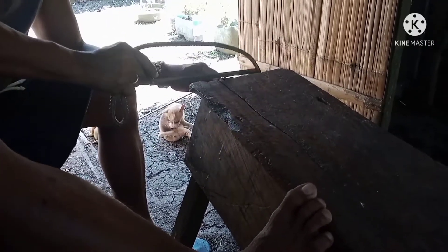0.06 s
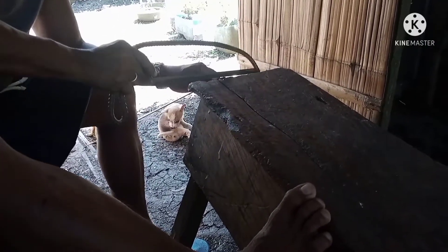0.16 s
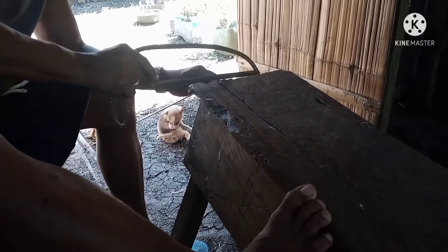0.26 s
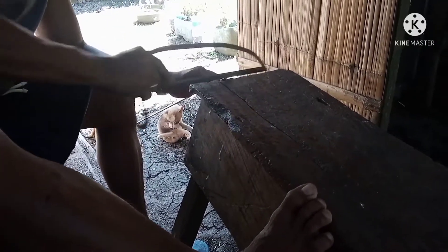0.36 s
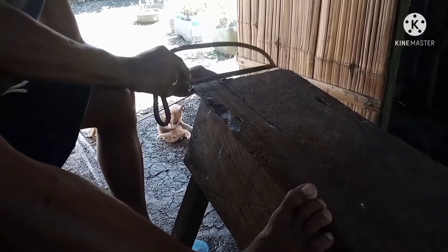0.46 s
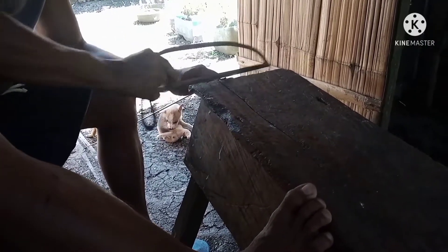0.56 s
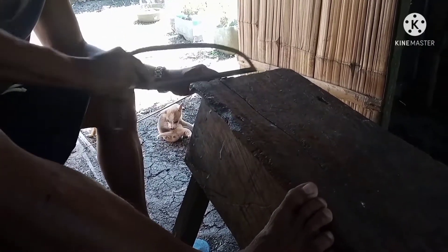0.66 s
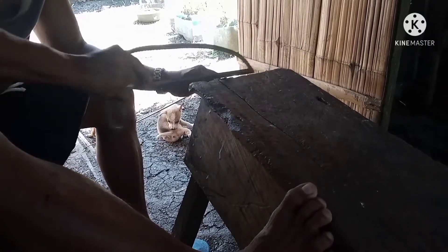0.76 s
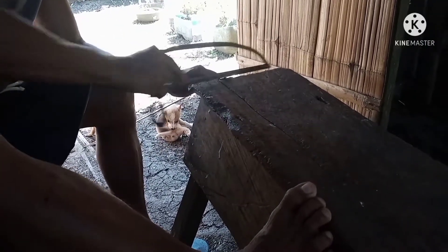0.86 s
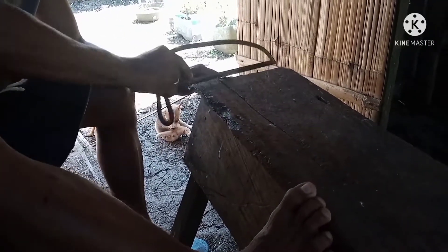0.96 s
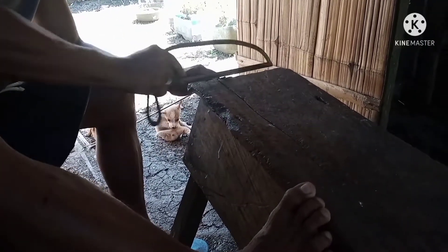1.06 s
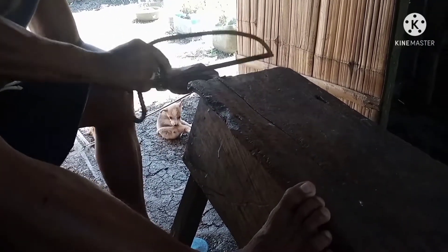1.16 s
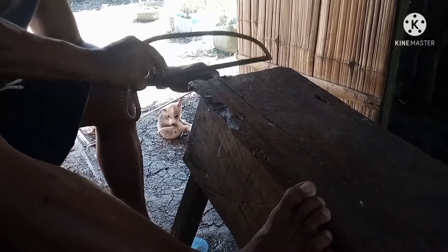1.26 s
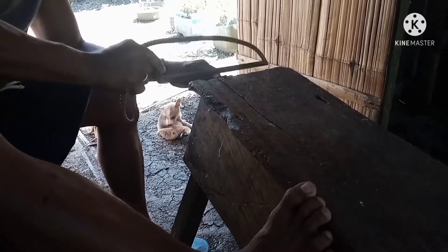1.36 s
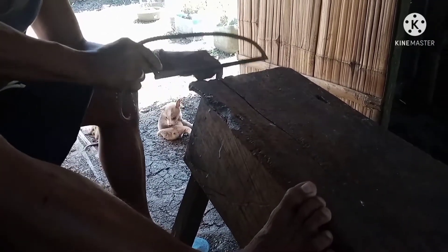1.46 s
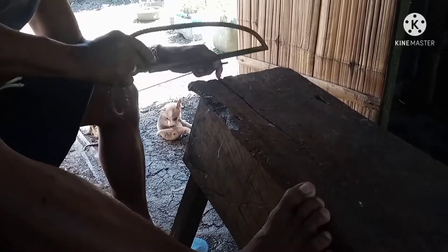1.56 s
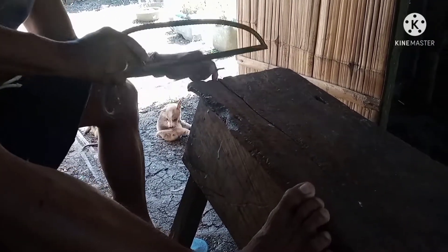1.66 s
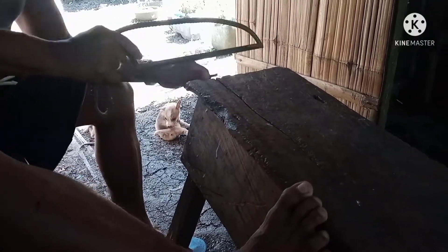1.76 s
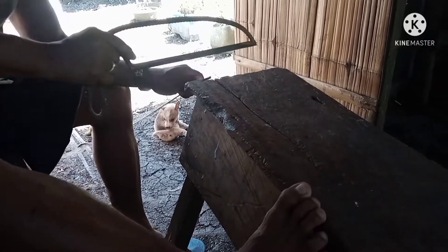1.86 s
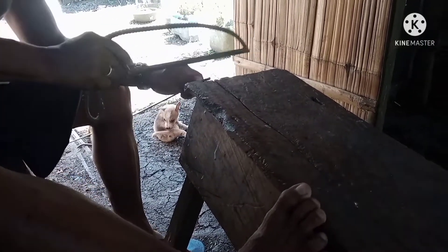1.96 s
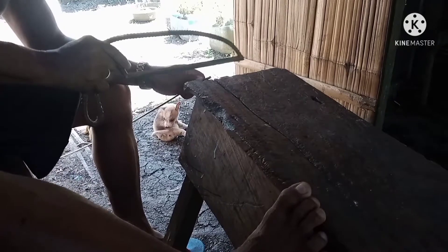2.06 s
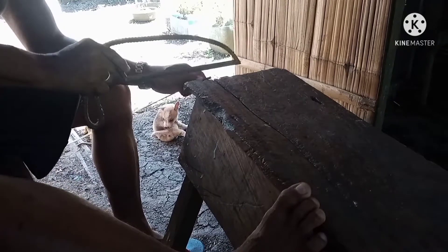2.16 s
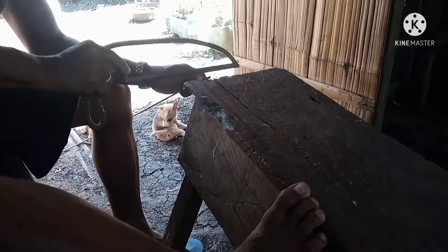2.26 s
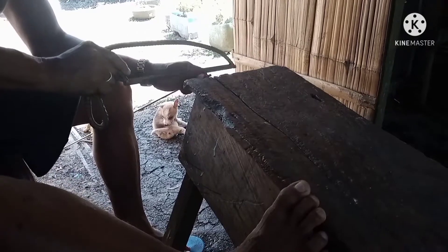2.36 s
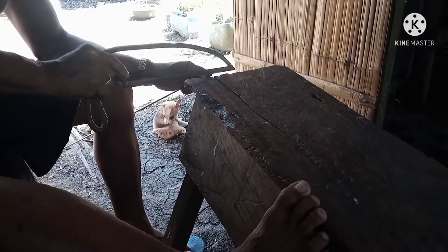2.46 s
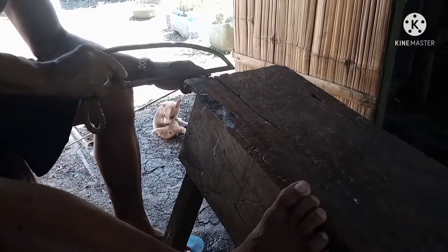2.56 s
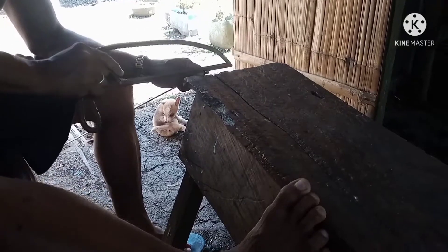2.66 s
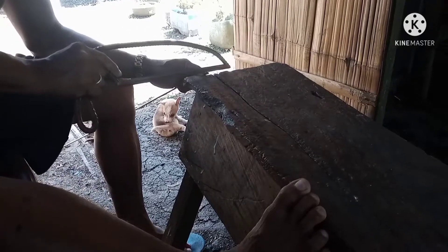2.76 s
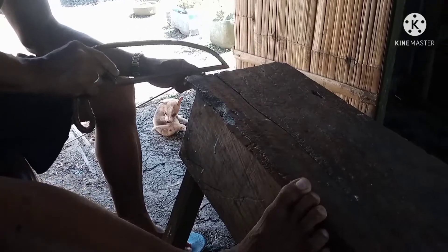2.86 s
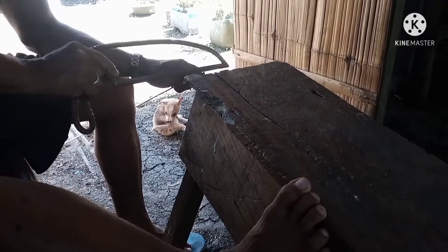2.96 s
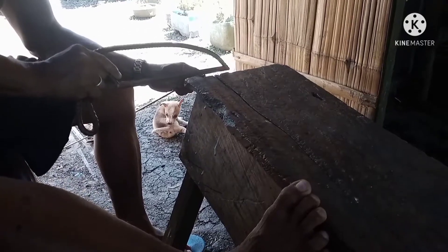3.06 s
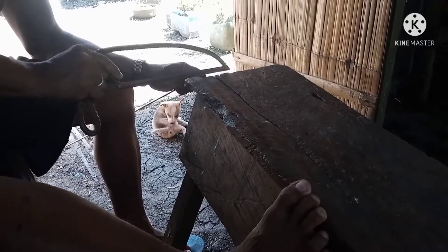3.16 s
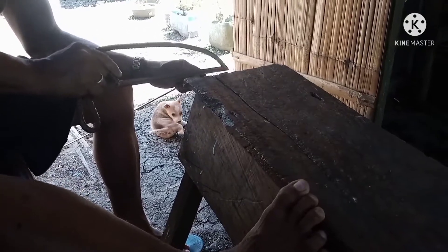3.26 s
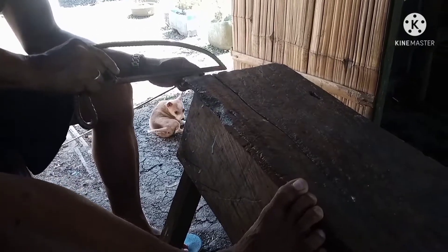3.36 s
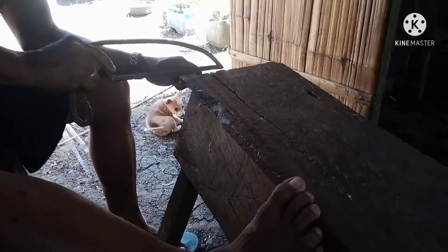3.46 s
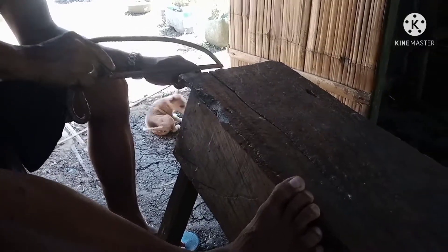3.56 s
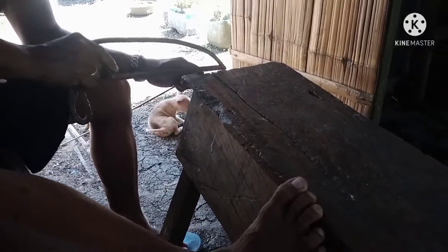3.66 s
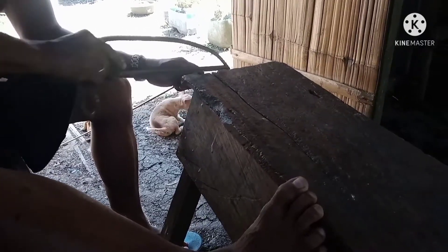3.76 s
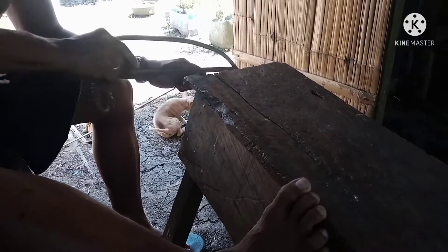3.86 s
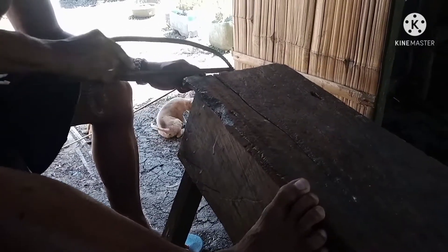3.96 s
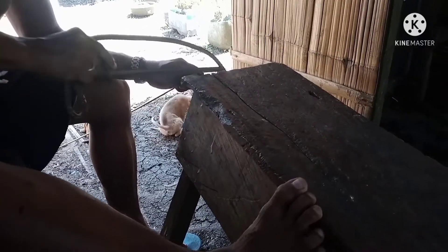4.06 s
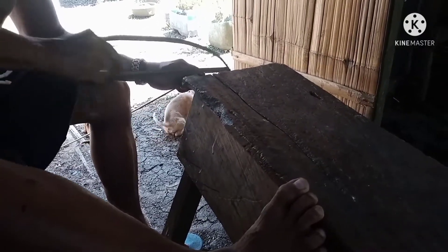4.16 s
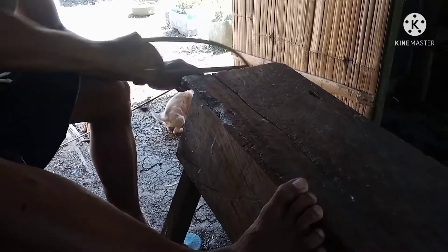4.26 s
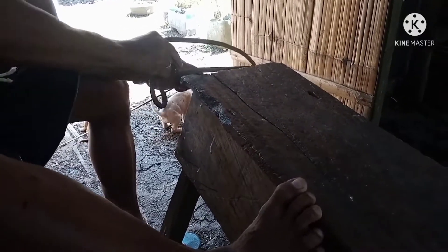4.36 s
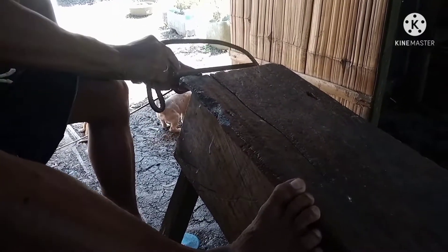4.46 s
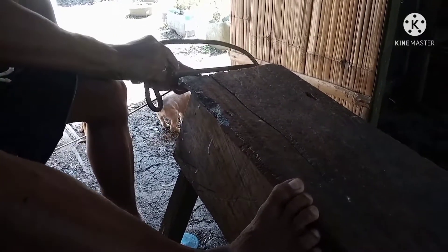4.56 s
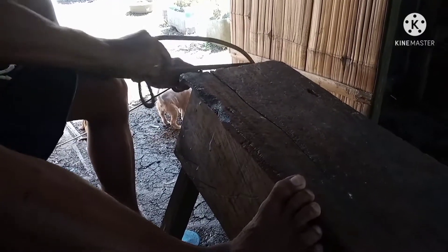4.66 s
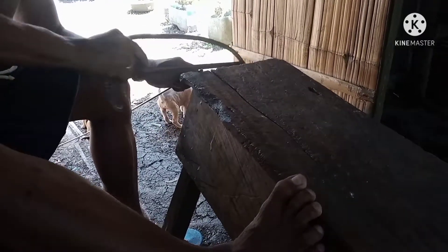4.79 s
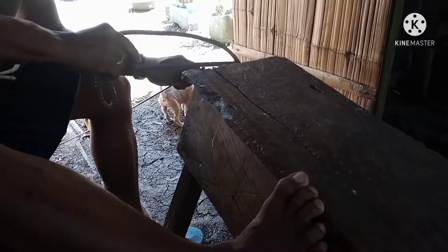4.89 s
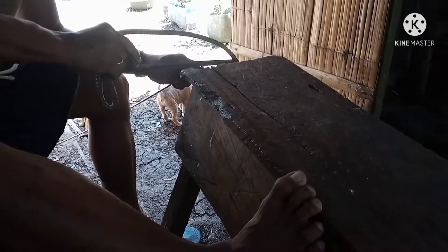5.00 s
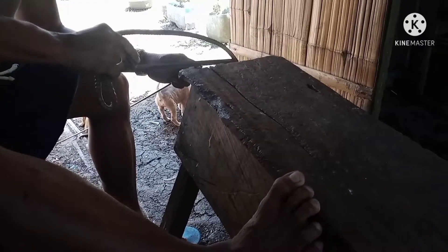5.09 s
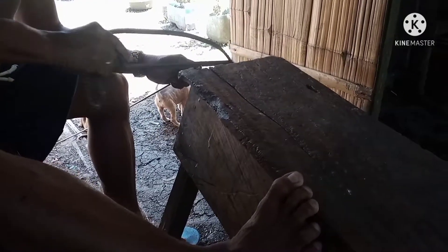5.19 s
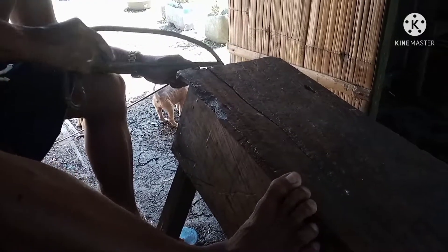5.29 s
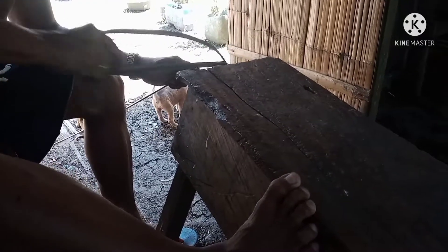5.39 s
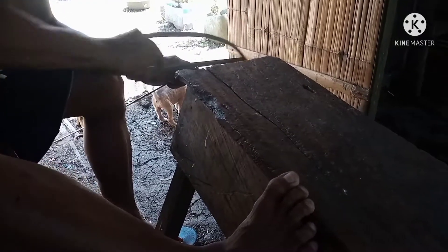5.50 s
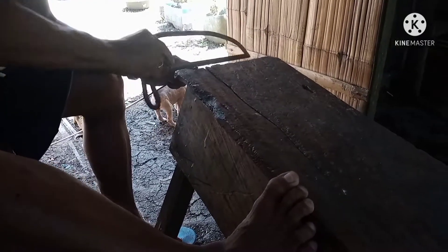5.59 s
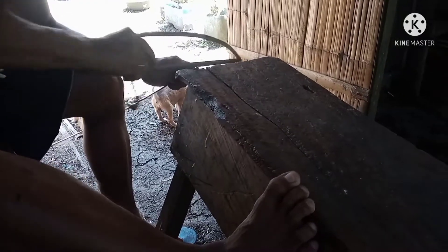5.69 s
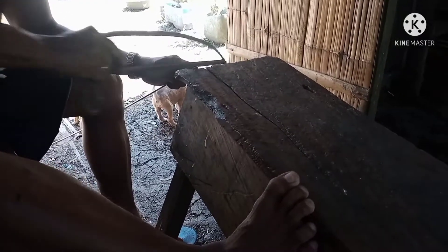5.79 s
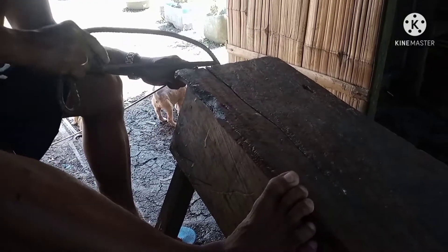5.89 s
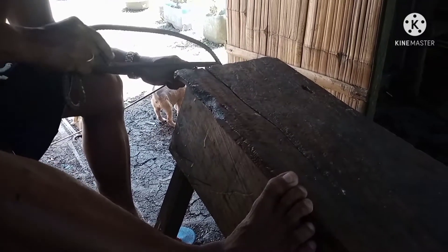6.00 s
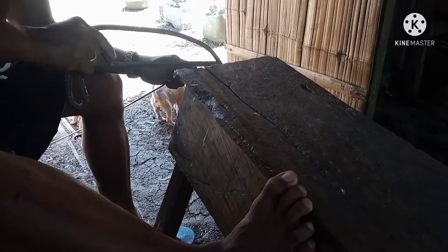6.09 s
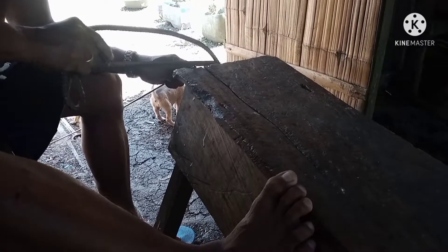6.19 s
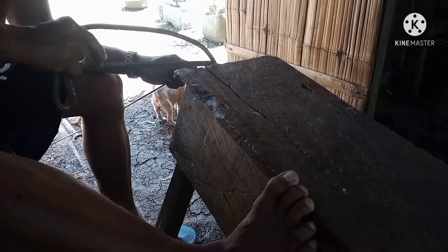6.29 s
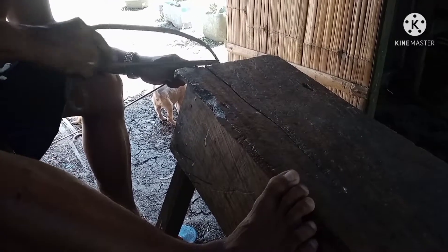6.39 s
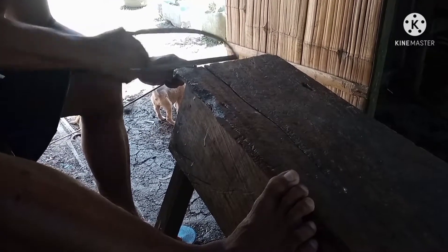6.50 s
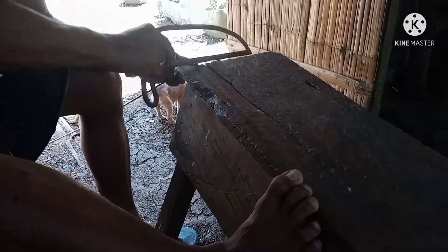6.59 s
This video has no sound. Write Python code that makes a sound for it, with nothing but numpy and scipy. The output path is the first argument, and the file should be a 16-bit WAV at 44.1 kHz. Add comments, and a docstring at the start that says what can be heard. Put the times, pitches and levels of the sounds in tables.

```python
"""A bow hacksaw cuts a steel rod on a heavy wooden bench in an open shed, heard close by in mono.
Three bright strokes and a fainter one skate over the rod; after a few knocks the saw runs deeper
in its groove, snagging now and then. Random tooth strikes ring steel and wood resonances together.
Short noise bursts make the clicks and thuds, gliding sines the blade's squeaks and a chick's peeps.
Filtered noise is the yard behind; the microphone loses the deep bass and the extreme treble."""
import sys
import numpy as np
from scipy import signal
from scipy.fft import rfft, irfft, next_fast_len
from scipy.io import wavfile
from scipy.ndimage import uniform_filter1d, map_coordinates

SR = 44100
rng = np.random.default_rng(int(sys.argv[2]) if len(sys.argv) > 2 else 0)


def store_pcm(level_fs):
    """Save levels as 16-bit WAV."""
    pcm = np.round(np.clip(level_fs, -1, 1) * 32767).astype(np.int16)
    wavfile.write(sys.argv[1], SR, np.atleast_2d(pcm).T)


N = 292824

# passes of the blade, before the trims in saw(): start_s, length_s, fastest_share (of the pass),
# rasp_db, hiss_over_rasp_db, bench_over_rasp_db
STROKES = [ (0.39, 0.262, .68, -22, 0.32, -12.2), (0.612, 0.31, 0.56, -22.5, -0.88, -6),
           (0.878, .26, 0.5, -22, -0.8, -8.3), (1.122, 0.1, 0.598, -29, -4.5, -8),
           (2.834, 0.18, 0.233, -62.5, 9, 4), (2.952, 0.18, .27, -43, 6.5, -1.5),
           (3.078, 0.28, .25, -61.5, -4, 3), (3.286, 0.1775, 0.2, -58, 5.5, 5.5),
           (3.446, 0.14, 0.32, -57.5, -6.5, 8.5), (3.585, 0.098, 0.28, -53.5, -4, 7),
           (3.803, .26, 0.52, -31, -4, 1.3), (4.022, 0.26, 0.61, -32.5, -0.3, 1.44),
           (4.214, 0.33, 0.52, -23.5, -2, -0.4), (4.726, 0.43, 0.4, -26.5, -0.65, 3.3),
           (5.239, .276, 0.61, -30.5, -0.82, -3), (5.466, .29, 0.56, -22.5, -4, -1.8),
           (5.725, 0.41, 0.47, -25, -1.5, 1.5), (6.076, .2, 0.24, -39, -5, 0),
           (6.272, 0.22, .53, -35, -3.5, 3), (6.474, 0.36, .32, -24, -5.5, -0.5)]
# short brushes of the teeth on the rod: start_s, length_s, level_db
BRUSHES = [(0.0, 0.029, -52.5), (0.205, 0.0265, -34.5), (0.466, .014, -37.5), (2.57, 0.077, -58.5)]
# blade resonances while skating, then in the groove: pitch_hz, width_hz, relative_level_db
SKATE_MODES = [(951, 68, -3), (1252.7, 26, -14.5), (1485, 12, -9), (1650, 120, -8), (2050, 43, -2),
               (2535, 120, -1.5), (3150, 280, 0.5), (3526, 75, -10), (4160, 77, -9.5), (4390, 68, -9),
               (5110, 75, -12), (5930, 54, -9), (6229, 81, -1.5), (7010, 62, -17.5), (6800, 56, -26.5)]
GROOVE_MODES = [(774, 102, 0), (954, 28, 1.5), (1780, 240, -3), (2270, 26, -15), (2710, 103, -4),
                (3208.4, 138.7, 1.18), (3435, 90, -3), (4674, 77, -0.5), (5070, 34, -7.5),
                (5726, 51, -21.5), (6041, 80, 7.5), (7373, 85, -0.5), (7823, 190, -5)]
# broad colour of the blade under those resonances: frequency_hz, relative_level_db
SKATE_RASP = [(400, -23), (620, -17.5), (780, -12.5), (1400, -15.5), (2300, -12.5), (2900, -14), (3500, -4),
              (4300, -13.5), (5400, -4.5), (6400, -9.5), (7200, -17.5), (8300, -39), (11000, -44)]
GROOVE_RASP = [(400, -64), (650, -15), (1100, -4), (1350, -13), (1800, -9), (2600, -5.5), (2900, -15.5),
               (3400, -9.5), (4300, -11.5), (5400, -6), (6400, 0.5), (7100, -8.5), (8300, -20.5),
               (11000, -35)]
# the blade skates on the rod before this time and runs in its groove after it
SEATED_S = 2.5


def saw():
    """Skating teeth ring bright; in the groove the rasp is deeper and throws more chips."""
    out = np.zeros(N)
    skate = lambda: body(SKATE_RASP, flexed(SKATE_MODES, shift=0.0015, spread_db=5.8), modes_db=-2)
    groove = lambda: body(GROOVE_RASP, flexed(GROOVE_MODES, shift=0.0058, spread_db=1.6), modes_db=-2)
    for row in STROKES:
        start_s = row[0]
        if start_s < SEATED_S:
            x = stroke(row, skate(), rate=2600, scatter_db=3.0, chatter_db=1.5, ring_db=-4.5,
                       rasp_db=-0.6, edge_db=0.2, bench_db=-1.0, fizz_db=-20.5)
        else:
            x = stroke(row, groove(), rate=1800, scatter_db=3.0, chatter_db=1.7, ring_db=-3.5,
                       rasp_db=0.82, edge_db=0.36, bench_db=0.2, fizz_db=-13.5)
        add(out, start_s, x)
    for start_s, length_s, level_db in BRUSHES:
        force = teeth(np.ones(int(length_s * SR)), rate=3500, scatter_db=2, chatter_db=1.5, rub=.5)
        add(out, start_s, amp(level_db) * through(np.pad(force, (0, SR // 8)), skate()))
    return out


# bench resonances: pitch_hz, width_hz, relative_level_db
BENCH = [(125, 12, -7.5), (167.4, 49.9, -3), (306, 31.6, -3.5), (412.47, 27.5, 7), (452.6, 30.3, 8),
         (571, 45, -1)]
# broad colours of the bench wood and of flying chips: frequency_hz, relative_level_db
WOOD = [(30, -55.5), (70, -29.5), (140, -30), (240, -21.5), (500, -8), (650, -31.5), (1200, -69.5)]
FIZZ = [(5000, -25.5), (7600, 13), (9200, 2.5), (11000, -6.5), (13000, -21.5), (15200, -9.5), (16000, -11)]
# snags in mid-pass, at full strength in the tooth edges: release_s, stuck_s, jerk_db
SNAGS = [(0.5056, 0.0068, 0), (0.746, 0.016, 0.5), (4.226, 0.0025, 7.5), (4.928, .003, -2.5),
         (4.954, 0.022, 5.5), (4.98, .013, 7), (5.017, 0.01434, 13), (5.054, .01, 11.5),
         (5.116, 0.027, 14.5), (5.816, 0.013, 7.5), (5.865, 0.0213, 5.5), (5.892, 0.0166, 0),
         (6.087, .012, 9)]
# each layer grows as this power of the blade's speed
RASP_POWER, HISS_POWER, BENCH_POWER = 1.67, 2.16, 1.41
# the first pass is already under way when the teeth land on the rod
TOUCHDOWN_S = 0.485
# after each turn of the arm the teeth hold for a moment before they slide
HOLD_S = .044
# the bench rocks under the blade, so that its drumming comes in lumps
ROCK_DB, ROCK_PER_S = 2.07, 70
# at full speed the teeth outrun the bench's low modes, and its drumming sags by this much
OUTRUN_DB = 5.5
# below this the blade's rasp, above it the hiss of the tooth edges
EDGE_HZ = 4000


def stroke(row, steel, rate, scatter_db, chatter_db, ring_db, rasp_db, edge_db, bench_db, fizz_db):
    """One pass of the blade: the same tooth strikes ring the steel, drum the bench and throw chips."""
    start_s, length_s, fastest_share, rasp_peak, hiss_over, bench_over = row
    speed = swing(length_s, fastest_share)
    t = start_s + np.arange(len(speed)) / SR
    speed_db = 20 * np.log10(speed)
    rasp = rasp_peak + RASP_POWER * speed_db
    edge = rasp_peak + hiss_over + HISS_POWER * speed_db
    bench = rasp_peak + bench_over + BENCH_POWER * speed_db
    bench += ROCK_DB * wobble(ROCK_PER_S, len(t)) - OUTRUN_DB * speed ** 4
    force = teeth(np.maximum(speed, .35), rate=rate, scatter_db=scatter_db, chatter_db=chatter_db, rub=0.38)
    force = force * (t >= TOUCHDOWN_S)
    snag = snagging(t, [(start_s + HOLD_S, HOLD_S, 0), *SNAGS])

    def drive(db, response):
        pushed = np.pad(force * amp(db), (0, SR // 8))
        return through(pushed, response / np.linalg.norm(response))

    # the flexing blade carries the lower rasp, the tooth edges the hiss above it
    blade = drive(rasp + rasp_db + 0.72 * snag, band(steel, EDGE_HZ, "low", order=5))
    blade += drive(edge + edge_db + snag, band(steel, EDGE_HZ, "high", order=5))
    blade += drive(edge + fizz_db + snag, body(FIZZ))
    ring = bending(blade, len(t), t60=0.044, count=5)
    wood = drive(bench + bench_db + 0.54 * snag, body(WOOD, BENCH))
    return (blade + amp(ring_db) * ring) / np.hypot(1, amp(ring_db)) + wood


def swing(length_s, fastest_share):
    """Speed of the arm over one pass, 0-1: from rest to full speed and back to rest."""
    u = np.linspace(0, 1, int(length_s * SR))
    turn = np.interp(u, [0, np.clip(fastest_share, .05, .95), 1], [0, .5, 1])
    return np.abs(np.sin(np.pi * turn)) + 1e-4


def teeth(speed, rate, scatter_db, chatter_db, rub):
    """Force of steady strength: uneven tooth strikes, denser with speed, clumped by chatter, over rubbing."""
    n = len(speed)
    struck = rng.random(n) < rate * speed / SR
    strikes = struck * amp(scatter_db * np.clip(rng.standard_normal(n), -2, 2))
    force = unit(strikes - strikes.mean()) + rub * rng.standard_normal(n)
    force = force * amp(chatter_db * wobble(169.0, n))
    # the hand keeps the mean pressure even over a few hundredths of a second
    return force / np.sqrt(np.abs(uniform_filter1d(force ** 2, size=1100)) + 1e-9)


# a stuck blade falls quiet at this rate down to a floor; the jerk dies with this time constant
STALL_DB_PER_S, STALL_DEPTH_DB, JERK_S = 1693.5, 15.5, 0.0089


def snagging(t, snags):
    """Gain in dB: the scrape dies away while the blade sticks and flares as it breaks free."""
    db = np.zeros(len(t))
    for release_s, stuck_s, jerk_db in snags:
        stall = np.clip(STALL_DB_PER_S * (t - release_s + stuck_s), 0, STALL_DEPTH_DB)
        db -= stall * (t < release_s)
        db += jerk_db * np.exp(-np.abs(t - release_s) / JERK_S) * (t >= release_s)
    return db


# the grip damps every mode of the saw to at least this width
NARROWEST_HZ = 38


def flexed(modes, shift, spread_db):
    """Each pass bends the blade differently, which nudges the pitch and strength of its modes."""
    chance = rng.standard_normal((len(modes), 2))
    return [(hz * (1 + shift * a), max(width, NARROWEST_HZ), db + spread_db * b)
            for (hz, width, db), (a, b) in zip(modes, chance)]


def bending(blade, length, t60, count):
    """The free length of the blade changes along the stroke, so one fine ring fades into the next."""
    travel = np.minimum(np.arange(len(blade)) / length, 1) * (count - 1)
    shares = [np.cos(np.clip(travel - k, -1, 1) * np.pi / 2) for k in range(count)]
    return sum(through(blade * share, ringing(t60)) for share in shares)


def ringing(t60):
    """The dense, short ring of blade and frame: decaying noise of energy 1."""
    t = np.arange(SR // 4) / SR
    x = rng.standard_normal(len(t)) * amp(-60 * t / t60)
    return x / np.linalg.norm(x)


# the blade sings in one of its modes: start_s, length_s, pitch_hz (centre), level_db
SQUEAKS = [(0.681, 0.064, 3229, -23), (0.802, 0.092, 974, -25), (0.931, 0.0166, 2544, -20),
           (0.989, .062, 1298, -25.5), (1.026, .08, 961, -27.5), (1.166, 0.045, 973, -36),
           (2.983, 0.05, 2650, -34)]


def squeaks():
    """For a moment the blade sticks and slips in step with one of its modes: a wavering sine."""
    out = np.zeros(N)
    for start_s, length_s, pitch_hz, level_db in SQUEAKS:
        n = int(length_s * SR)
        pitch = pitch_hz * (1 + 0.024 * wobble(400, n))
        tone = np.sin(2 * np.pi * np.cumsum(pitch) / SR)
        add(out, start_s, amp(level_db) * np.hanning(n) * tone)
    return out


# steel touches steel, before the trims in taps(): start_s, level_db, knock_over_db (bench),
# fizz_over_db (chips)
TAPS = [(0.046, -36, -19, -26.5), (0.2038, -40, 2.5, -22), (0.2221, -27, -5, -16), (0.284, -28, -22, -20),
        (0.4104, -26.5, -15.5, -40), (0.4859, -14, -13.5, -24.5), (1.9641, -33.5, -20, -43.5),
        (1.9832, -36.5, -5, -43.5), (2.2545, -28, -18, -33), (2.5694, -30.5, -17, -9.5),
        (3.7324, -20.5, -19.5, -21.5), (3.753, -33.5, -16, -43.5), (5.199, -39.5, 0, -23),
        (5.2521, -53.5, 8, -18)]
# broad colour of the click: frequency_hz, relative_level_db
CLICK = [(200, -35), (900, 6.5), (1500, -5), (2600, 4), (4000, 2.5), (6600, 10.5), (7800, -24),
         (11000, -25)]
# the longer of the two rings in a tap
TAP_T60_S = 0.093


def taps():
    """The blade clicks against the rod, cracks off chips and knocks the bench under it."""
    out = np.zeros(N)
    steel, wood, chips = body(CLICK), body(WOOD, BENCH), body(FIZZ)
    for start_s, level_db, knock_db, fizz_db in TAPS:
        blow = ringing(t60=0.011) + amp(-3.0) * ringing(t60=TAP_T60_S)
        layers = [(steel, level_db + 2), (wood, level_db + knock_db), (chips, level_db + fizz_db + 8.0)]
        for response, peak_db in layers:
            x = through(blow, response)
            add(out, start_s, amp(peak_db) * x / np.abs(x).max())
    return out


# the rod is bumped on the bench: start_s, peak_db, dull_above_hz
BUMPS = [(0.017, -47.5, 110), (0.227, -31, 686), (0.315, -38, 90), (1.709, -50, 1500), (1.982, -29, 1400),
         (2.009, -31, 590), (2.195, -29.5, 700), (2.388, -30.5, 600), (2.585, -41, 673),
         (3.024, -44.5, 400), (3.07, -46, 300), (3.725, -42.5, 600)]
# broad colour of the thud: frequency_hz, relative_level_db
THUD = [(30, -61), (75, -12.5), (165, 2.5), (260, -15), (440, 3.5), (700, -7.5), (1500, -3.5), (5000, 5),
        (12000, -22)]
# how long the thud lasts: frequency_hz, t60_s
THUD_DECAY = [(100, 0.33), (170, 0.28), (450, 0.17), (1200, 0.14), (6000, 0.03)]


def bumps():
    """Soft blows on the bench: the low notes of the plank last longest."""
    out = np.zeros(N)
    for start_s, peak_db, dull_hz in BUMPS:
        thud = band(through(tail(THUD_DECAY), body(THUD)), dull_hz, "low", order=2)
        add(out, start_s, amp(peak_db) * thud / np.abs(thud).max())
    return out


# chick calls, before waver, swell and echo: start_s, length_s, top_pitch_hz, level_db
PEEPS = [(0.124, 0.207, 3600, -68), (1.22, 0.084, 4523, -59), (1.378, 0.064, 4450, -62.5),
         (1.615, 0.2, 3653, -69.5), (2.005, 0.149, 3894, -56), (2.444, 0.16, 3875, -54),
         (2.825, 0.162, 3945, -56.5), (3.38, 0.16, 3720, -63), (3.814, 0.221, 3650, -64),
         (4.518, 0.061, 3900, -58), (4.592, 0.0745, 3870, -55), (6.195, 0.126, 4430, -65)]
# glide within a call: share_of_call, share_of_top_pitch
PEEP_SHAPE = [(0, .93), (.12, .99), (.3, 1), (.7, .99), (.84, .81), (1, .67)]
# echo of the shed, also used for the chick: frequency_hz, t60_s
SHED = [(150, 0.15), (1000, 0.25), (4000, 0.12), (12000, 0.076)]


def chick(echo_db, wall_s):
    """Thin whistles that rise, hold and fade as they drop; echoes from the yard break them up."""
    out = np.zeros(N)
    for start_s, length_s, top_hz, level_db in PEEPS:
        u = np.linspace(0, 1, int(length_s * SR))
        glide = np.interp(u, *np.transpose(PEEP_SHAPE))
        # the pitch is least steady where it is low
        waver = (0.0032 + 0.085 * (1 - glide)) * wobble(157.5, len(u))
        phase = 2 * np.pi * np.cumsum(top_hz * glide * (1 + waver)) / SR
        swell = np.abs(np.sin(np.pi * u)) ** .5 * glide ** 2
        swell = swell * amp(level_db + 2.3 * wobble(46.8, len(u)))
        peep = swell * (np.sin(phase) + 3 * (1 - glide) * np.sin(2 * phase))
        add(out, start_s, amp(1) * peep)
        add(out, start_s + wall_s, amp(-3.5) * peep)
    return out + amp(echo_db) * through(out, tail(SHED))


# broad colour of the open air: frequency_hz, relative_level_db
YARD = [(18, -46.5), (30, -7.5), (81, 0.5), (263, -15), (622, -20.5), (970, -19), (1300, -20.5),
        (1680, -17.5), (2620, -12), (4420, -12), (6370, 0.5), (8060, -23.5), (9940, -21.5), (13600, -42.5),
        (15500, -34)]


def yard(level_db):
    """Steady outdoor hiss with a faint rumble: coloured noise whose level drifts slightly."""
    hiss = unit(through(rng.standard_normal(N), body(YARD)))
    return amp(level_db + 0.47 * wobble(3.6, N)) * hiss


def tail(decays):
    """Noise of energy 1 in which each frequency dies at its own speed."""
    hz, t, z = signal.stft(rng.standard_normal(SR // 2), SR, nperseg=256)
    fade = amp(-60 * t / along(decays, hz)[:, None])
    x = signal.istft(z * fade, SR, nperseg=256)[1]
    return x / np.linalg.norm(x)


GRID = np.fft.rfftfreq(8192, 1 / SR)


def body(colour, modes=(), modes_db=0):
    """Causal impulse response, of energy 1, of a broad colour with resonances standing on it."""
    power = amp(along(colour, GRID)) ** 2
    for hz, width, db in modes:
        power = power + amp(db + modes_db) ** 2 / (1 + ((GRID - hz) / width) ** 2 * 2) ** 2
    # folding the cepstrum makes the response minimum-phase: it starts at once
    cepstrum = irfft(np.log(power + 1e-12) / 2)
    half = len(cepstrum) // 2
    cepstrum[1:half] *= 2
    cepstrum[half + 1:] = 0
    response = irfft(np.exp(rfft(cepstrum)))[:half]
    return response / np.linalg.norm(response)


def through(x, response):
    """Convolve, keeping the length."""
    return signal.fftconvolve(x, response)[:len(x)]


def band(x, hz, kind, order):
    """Butterworth low-pass or high-pass."""
    return signal.sosfilt(signal.butter(order, hz, kind, fs=SR, output="sos"), x)


def wobble(rate, size):
    """A smooth random curve, rate knots a second."""
    return map_coordinates(rng.standard_normal(4096), [np.arange(size) * rate / SR], mode="wrap")


def along(points, hz):
    """Interpolate (frequency, value) points on a log frequency axis."""
    f, v = np.transpose(points)
    return np.interp(np.log(hz + 1), np.log(f + 1), v)


def amp(db):
    """Decibels to gain."""
    return 10 ** (np.asarray(db) / 20)


def unit(x):
    """Scale to rms 1."""
    return x / np.sqrt(np.mean(x ** 2) + 1e-20)


def add(track, start_s, x):
    """Mix x into the track from start_s."""
    i = max(0, round(start_s * SR))
    track[i:i + len(x)] += x[:max(0, N - i)]


def scene():
    """Everything at the bench is answered faintly by the shed; chick and yard lie behind it."""
    near = saw() + squeaks() + taps() + bumps()
    shed = amp(-15.5) * through(near, tail(SHED))
    far = chick(echo_db=-8, wall_s=.011)
    return (near + shed + far + yard(level_db=-59.5))[None]


# band limit of the microphone
TOP_HZ = 15830


def record(dry):
    """The phone's microphone thins out the deep bass and keeps nothing above its band limit."""
    thin = band(dry, hz=52.8, kind="high", order=3)
    m = next_fast_len(N + SR // 4)
    kept = np.fft.rfftfreq(m, 1 / SR) < TOP_HZ
    return irfft(rfft(thin, m) * kept, m)[..., :N]


dry = scene()
out = record(dry)
store_pcm(out)
```